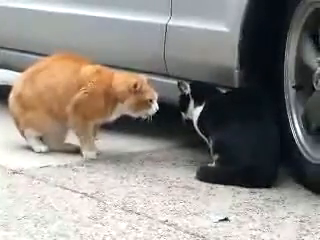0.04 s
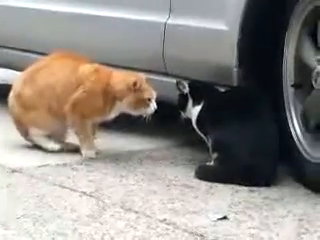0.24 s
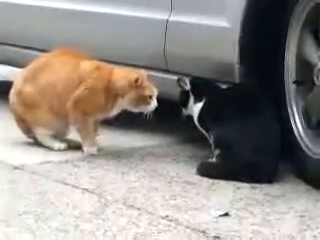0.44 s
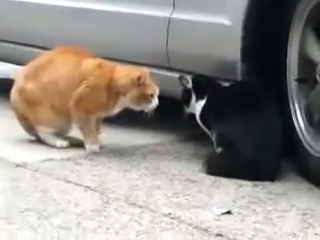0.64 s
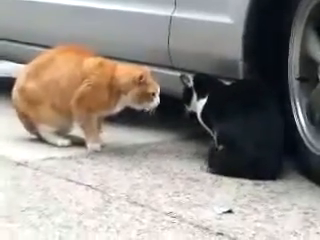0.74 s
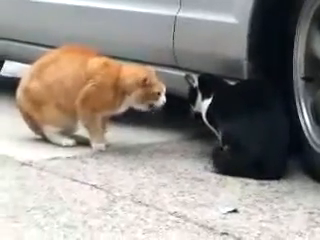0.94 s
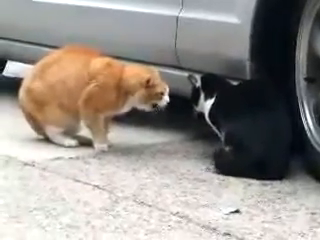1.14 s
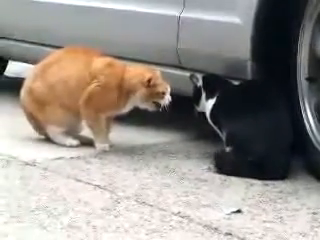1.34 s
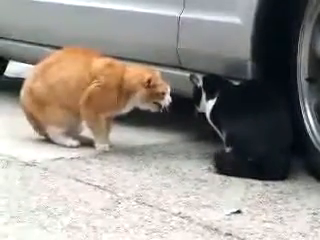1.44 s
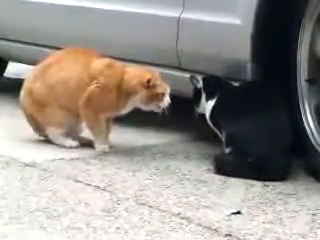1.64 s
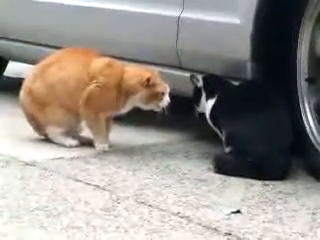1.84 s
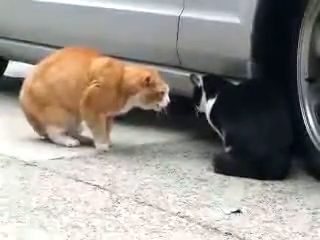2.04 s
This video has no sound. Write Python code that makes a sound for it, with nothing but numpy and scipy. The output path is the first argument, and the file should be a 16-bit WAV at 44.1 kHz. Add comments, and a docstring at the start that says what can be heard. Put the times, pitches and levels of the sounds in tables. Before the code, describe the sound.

A cat gives a short, sinking yowl, pauses, then growls and opens into a long, bright wail that cracks upward and falls. It is close to the microphone outdoors, with faint distant traffic and a low hum behind.

```python
"""A cat yowls twice at a rival, outdoors beside a parked car, in front of one small mono recorder.
Pulses of its vocal folds ring the throat and mouth. The first yowl sinks and fades with the mouth nearly
shut; the second starts as a rattling growl, speeds up into a clear bright wail, cracks upward and closes
again. Ground and car reflect it to the microphone. Distant traffic and a low hum lie behind, and a faint
low tone swells in the pause."""
import sys
import numpy as np
from scipy import signal
from scipy.fft import rfft, irfft
from scipy.io import wavfile

SR = 44100
rng = np.random.default_rng(int(sys.argv[2]) if len(sys.argv) > 2 else 0)


def unload_wav(signal):
    """Save mono or channel-first audio to the path in sys.argv[1] as 16-bit WAV at rate SR, clipped to [-1, 1]."""
    wavfile.write(
        sys.argv[1],
        SR,
        np.round(np.clip(np.atleast_2d(signal).T, -1, 1) * 32767).astype(np.int16),
    )


N = 91948
TIME = np.arange(N) / SR

# pulse rate of the vocal folds: t/s, f/Hz
SINKING_PITCH = [(-.02, 324.3), (.037, 352.8), (.046, 423), (.068, 418.5), (.078, 366.3), (.138, 366.8),
                 (.165, 353.5), (.213, 347.4), (.298, 331), (.325, 309.7), (.362, 285), (.412, 273.5)]
WAILING_PITCH = [(.982, 176.2), (1.03, 207.2), (1.06, 277.5), (1.09, 337), (1.108, 378), (1.13, 418.2),
                 (1.21, 473.5), (1.274, 473), (1.31, 485.7), (1.41, 508), (1.47, 518.4), (1.54, 512.5),
                 (1.61, 503.5), (1.657, 484), (1.668, 509.9), (1.69, 523), (1.712, 556), (1.738, 546.7),
                 (1.748, 464), (1.796, 462.5), (1.838, 430.2), (1.9, 419.6), (1.985, 393.5), (2.028, 389.4),
                 (2.12, 402.5)]
# voice in the first mouth resonance: t/s, level/dB
SINKING_LEVEL = [(0.0, -19), (0.013, -22.5), (0.036, -13.5), (0.054, -20), (0.085, -19), (0.14, -27.5),
                 (0.166, -17), (0.205, -17.5), (0.241, -28.5), (0.31, -24.5), (0.346, -38), (0.39, -29.5)]
WAILING_LEVEL = [(0.97, -29), (1.03, -18), (1.055, -14), (1.088, -10), (1.103, -18), (1.16, -14.0),
                 (1.2, -18), (1.27, -16), (1.323, -14.5), (1.36, -22.0), (1.4, -21), (1.48, -16.5),
                 (1.521, -24), (1.551, -17.5), (1.581, -32), (1.604, -19.5), (1.635, -20), (1.651, -13.5),
                 (1.7, -21), (1.73, -23.5), (1.78, -21), (1.81, -27.5), (1.861, -22), (1.9, -29.5),
                 (1.961, -18), (2.015, -20), (2.024, -19.5), (2.036, -20.5)]
# hoarseness, except the spike at 2.02 s, a brief splice-like glitch: t/s, roughness/0-1
SINKING_ROUGHNESS = [(.03, .06), (.05, .12), (.078, .22), (.095, .04), (.35, .06)]
WAILING_ROUGHNESS = [(1.0, .4), (1.085, .33), (1.125, .18), (1.2, .05), (1.63, .04), (1.675, .12),
                     (1.705, .03), (1.765, .07), (2.012, .08), (2.021, .5), (2.032, .08)]
# mouth resonances 1-4: t/s, f1/Hz, f2/Hz, level2/dB, f3/Hz, level3/dB, level4/dB
SINKING_MOUTH = [(0.0, 1000.0, 2080.0, -36, 4200, -34.5, -39.5), (0.06, 990, 2040, -31, 3970, -36.5, -35),
                 (0.111, 980.0, 2235, -36, 4050, -36.5, -42.5),
                 (0.182, 1005, 2100.0, -36.5, 3900, -41, -40), (0.287, 760, 2024, -35, 4130, -36.5, -39.5),
                 (0.401, 784, 1995, -43.5, 3850, -40.5, -46.5)]
WAILING_MOUTH = [(0.988, 1104, 2040.0, -39.5, 4070.0, -58.5, -36.5),
                 (1.052, 1120.0, 2117, -32, 3800.0, -33.5, -39),
                 (1.087, 1280.0, 2240, -35.5, 4350.0, -29.5, -33.5),
                 (1.132, 1520.0, 2245, -24, 4900.0, -39.5, -36.5),
                 (1.15, 1610, 2500.0, -29.5, 3500.0, -31.5, -35),
                 (1.185, 1670.0, 2550.0, -30.5, 3780, -35, -40),
                 (1.211, 1630.0, 3000, -25, 4100.0, -27.5, -40.5),
                 (1.29, 1900.0, 3050, -26, 4100.0, -30.0, -41),
                 (1.356, 1800.0, 3304, -29, 4420.0, -35, -35),
                 (1.384, 1906, 2930.0, -19, 3560, -25.5, -36.5),
                 (1.479, 2010.0, 2990, -25.5, 3730.0, -25, -36.5),
                 (1.559, 1840.0, 2870, -23.5, 3800.0, -24, -35),
                 (1.618, 1600.0, 2950.0, -25.5, 3480.0, -28.5, -31),
                 (1.656, 1460.0, 2770, -49, 3370.0, -32.5, -34.5),
                 (1.727, 1240.0, 2800.0, -34.5, 3430, -30.5, -28.5),
                 (1.752, 1280.0, 2880.0, -33.5, 3930.0, -43, -38.5),
                 (1.86, 1100.0, 2845, -39.0, 4670.0, -45, -39.5),
                 (1.909, 1060.0, 2220, -36, 4510.0, -39, -44),
                 (1.97, 1050.0, 2800.0, -39, 4500.0, -44, -40),
                 (2.08, 980.0, 2630, -41, 4490.0, -37, -39.5)]


def cat():
    """The foreground voice: a short sinking yowl, then a growl that opens into a wail."""
    sinking = yowl(SINKING_PITCH, SINKING_LEVEL, SINKING_ROUGHNESS, SINKING_MOUTH)
    wailing = yowl(WAILING_PITCH, WAILING_LEVEL, WAILING_ROUGHNESS, WAILING_MOUTH)
    return sinking + wailing


def yowl(pitch, level, roughness, mouth, attack_s=.0089, release_s=.0095):
    """One call: fold pulses and breath ring the throat and mouth; roughness trades tone for rasp."""
    start, end = pitch[0][0], pitch[-1][0]
    sounding = (TIME >= start) & (TIME < end)
    t = TIME[sounding]
    (f0,), (db,), (rough,) = curves(pitch, t), curves(level, t), curves(roughness, t)
    phase = vocal_folds(t, f0, rough)
    resonances = throat_and_mouth(t, db, mouth)
    tone = np.sqrt(1 - rough ** 2) * harmonics(phase, f0, rough, resonances)
    gate = np.clip((t - start) / attack_s, 0, 1) * np.clip((end - t) / release_s, 0, 1)
    call = np.zeros(N)
    call[sounding] = gate * (tone + rasp(phase, rough, resonances))
    return call


def vocal_folds(t, f0, rough, tremor_hz=36):
    """Phase of the pulses: the pitch quivers and wavers slightly, and jitters with roughness."""
    tremor = .0025 * np.sin(2 * np.pi * tremor_hz * t)
    waver = .0025 * drift(len(t), rate_hz=35)
    jitter = .07 * rough * drift(len(t), rate_hz=250)
    return phase_of(f0 * (1 + tremor + waver + jitter))


def throat_and_mouth(t, db1, mouth, throat_hz=791, hz4=5200):
    """One throat and four mouth resonances, each as (f/Hz, gain, centre over half width, is upper)."""
    hz1, hz2, db2, hz3, db3, db4 = curves(mouth, t)
    throat_db = -22 + .5 * db1   # follows half of the voice's swing
    return [(np.full(len(t), throat_hz), from_db(throat_db), 3, False),
            (hz1, from_db(db1), 6.9, False),
            (hz2, from_db(db2), 15.8, True),
            (hz3, from_db(db3), 12.4, True),
            (np.full(len(t), hz4), from_db(db4), 9.9, True)]


def harmonics(phase, f0, rough, resonances, steepness=1.07, flutter_db=2.6, smear_from_hz=280):
    """The voiced tone: the resonances lift and delay the overtones, and each flutters on its own."""
    orders = np.arange(2, 30)[:, None]   # the fundamental is too weak to hear
    power, lag = 0, 0
    for hz, gain, sharpness, upper in resonances:
        widening = 1 + 1.2 * rough * upper
        detuning = (orders * f0 / hz - 1) * sharpness / widening
        shape = (1 + detuning ** 2) ** (-2 * steepness)
        power += gain ** 2 * shape / shape.sum(axis=0)
        lag += np.arctan(detuning)   # each resonance rings on after the pulse
    flutter = from_db([flutter_db * drift(len(f0), rate_hz=42) for _ in orders])
    # slow pulses are crisp; faster ones run together
    smear_rad = 2.5 * np.sqrt(np.clip(f0 / smear_from_hz - 1, 0, 1))
    offsets = smear_rad * rng.standard_normal(orders.shape)
    return np.sum(np.sqrt(2 * power) * flutter * np.sin(orders * phase - lag + offsets), axis=0)


def rasp(phase, rough, resonances, level_db=-2, dip_db=14):
    """Breath noise in each resonance, let through in one puff per pulse of the folds."""
    breath = 0
    for hz, gain, sharpness, upper in resonances:
        amount = np.hypot(rough, .045 * upper)   # the treble keeps a little rasp in the clear voice
        breath += gain * amount * noise_band(phase_of(hz), width_hz=.7 * hz.mean() / sharpness)
    puffs = rms_one(from_db(-dip_db * np.sin(phase / 2 - np.pi / 4) ** 2))
    return from_db(level_db) * puffs * breath


# bounces off ground and car, about 1.3 and 3 m of extra path to the microphone: delay/s, level/dB
REFLECTIONS = [(.0038, -20.5), (0.009, -19)]


def yard(voice, tail_db=-26, t60_s=.2):
    """The voice at the microphone: direct sound, two near reflections and a faint, short scatter."""
    t = TIME[:SR // 2]
    scatter = rng.standard_normal(len(t)) * from_db(-60 * t / t60_s)
    scatter *= from_db(tail_db) / np.sqrt(np.sum(scatter ** 2))
    near = sum(from_db(db) * np.interp(TIME - delay, TIME, voice, left=0) for delay, db in REFLECTIONS)
    return voice + near + signal.fftconvolve(voice, scatter)[:N]


# spectrum of the distant traffic: f/Hz, level/dB
TRAFFIC_SPECTRUM = [(22, -36.5), (45, -3), (76, -13.5), (110, -9), (170, -13), (270, -11), (400, -13.5),
                    (780, -14.5), (1300, -18.5), (2350, -31.5), (3760, -34.5), (5500, -40.5)]
# tones of the hum: f/Hz, wander/Hz, level/dB relative to the traffic
HUM_TONES = [(46.27, 2.6, -6.5), (110, 5.2, -14)]
# traffic and hum, ducked by the recorder's gain control during the loud wail: t/s, level/dB
BACKGROUND_LEVEL = [(0, -26.5), (.5, -25), (1.12, -24.5), (1.32, -29), (1.68, -31.5), (1.82, -26.5),
                    (1.93, -26), (2.08, -29.5)]


def street():
    """A dull wash of distant traffic with a wavering low hum."""
    spectrum_hz, spectrum_db = np.transpose(TRAFFIC_SPECTRUM)
    bin_hz = np.maximum(np.arange(N // 2 + 1) * SR / N, 1)
    colour = from_db(np.interp(np.log(bin_hz), np.log(spectrum_hz), spectrum_db))
    wash = rms_one(irfft(rfft(rng.standard_normal(N)) * colour, N))
    hum = 0
    for hz, wander_hz, db in HUM_TONES:
        phase = phase_of(hz + wander_hz * drift(N, rate_hz=2 * wander_hz))
        hum += from_db(db) * np.sqrt(2) * np.sin(phase)
    return from_db(curves(BACKGROUND_LEVEL, TIME)[0]) * (wash + hum)


def low_moan(peak_s=.62, spread_s=.035, hz=420, level_db=-26):
    """A faint, blurred low tone swells and fades between the yowls."""
    t = TIME - peak_s
    swell = from_db(level_db) * np.exp(-(t / spread_s) ** 2 / 2)
    return swell * noise_band(2 * np.pi * hz * t, width_hz=70)


def from_db(db):
    """Decibels to gain."""
    return 10 ** (np.asarray(db) / 20)


def rms_one(x):
    """Scale to unit rms."""
    return x / np.sqrt(np.mean(x ** 2) + 1e-20)


def curves(rows, t):
    """Each column of a table at the times t."""
    times, *columns = np.transpose(rows)
    return [np.interp(t, times, column) for column in columns]


def drift(size, rate_hz):
    """Smooth random motion of unit rms."""
    return rms_one(lowpass(rng.standard_normal(size + SR), rate_hz, order=2)[SR:])


def noise_band(phase, width_hz):
    """Narrow noise of unit rms around a steady or moving centre."""
    size = len(phase)
    return (drift(size, width_hz) * np.cos(phase) + drift(size, width_hz) * np.sin(phase)) / np.sqrt(2)


def phase_of(hz):
    """Running phase of a moving frequency."""
    return 2 * np.pi * np.cumsum(hz) / SR


def lowpass(x, hz, order):
    """Roll off the sound above hz."""
    return signal.sosfilt(signal.butter(order, hz, fs=SR, output="sos"), x)


def scene():
    """The cat in front, the street far behind."""
    return (yard(cat()) + street() + low_moan())[None]


def record(dry, ceiling=.9, cutoff_hz=7500):
    """A small recorder rounds the peaks and samples at a quarter rate, which mirrors the treble."""
    rounded = dry / (1 + (dry / ceiling) ** 8) ** (1 / 8)
    narrow = lowpass(rounded, hz=SR / 8, order=14)
    sampled = 4 * narrow * (np.arange(N) % 4 == 0)
    smooth = lowpass(sampled, hz=5433, order=10)   # gentle enough to let some mirror image through
    return signal.sosfilt(signal.cheby2(14, 60, cutoff_hz, fs=SR, output="sos"), smooth)


dry = scene()
out = record(dry)
unload_wav(out)
```